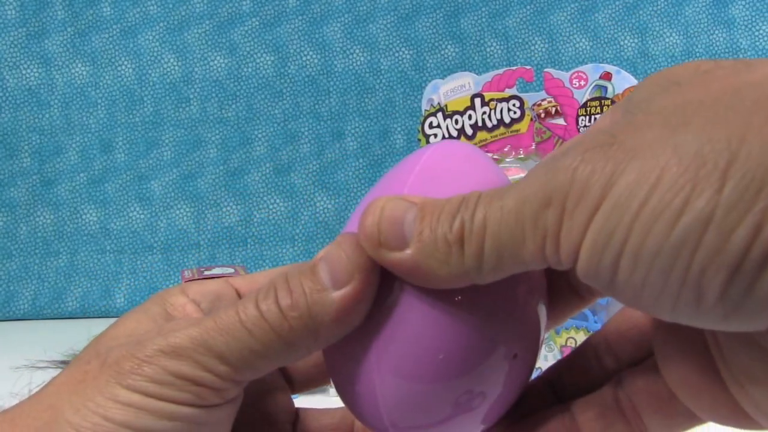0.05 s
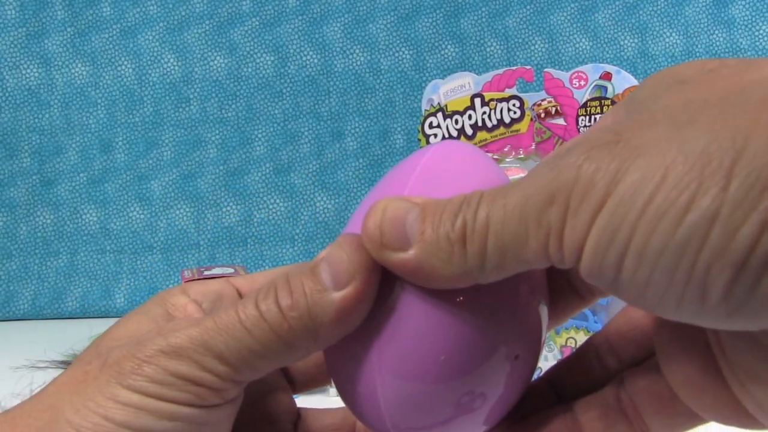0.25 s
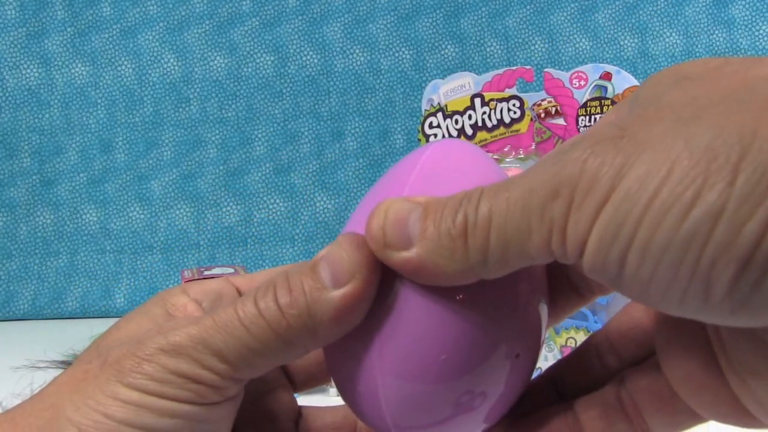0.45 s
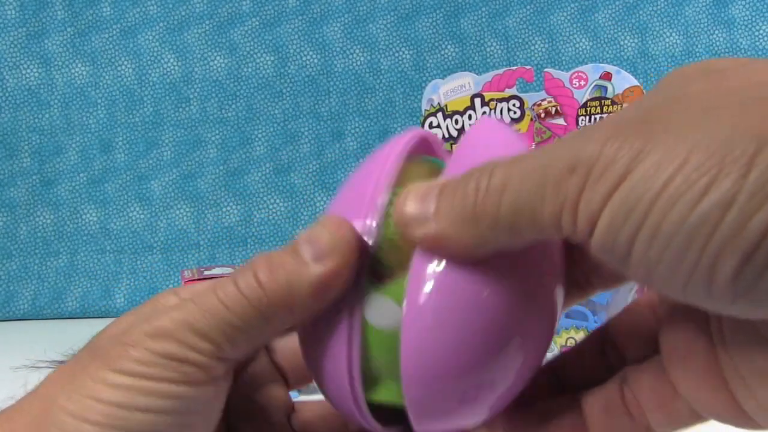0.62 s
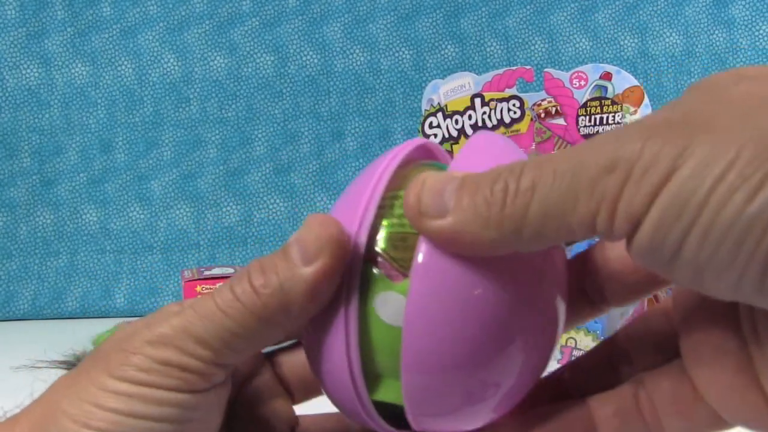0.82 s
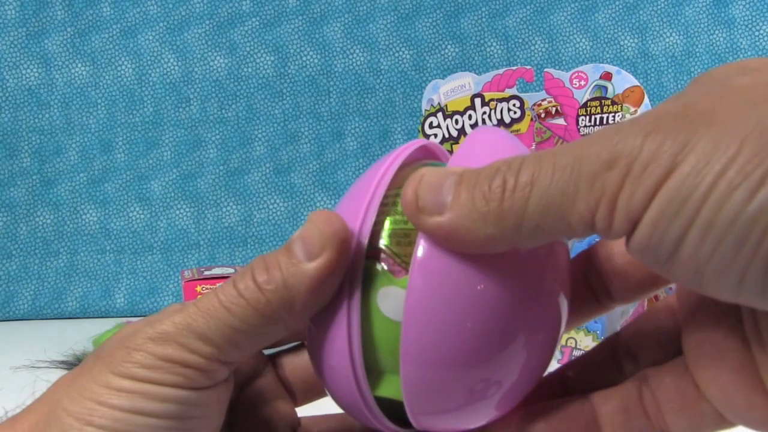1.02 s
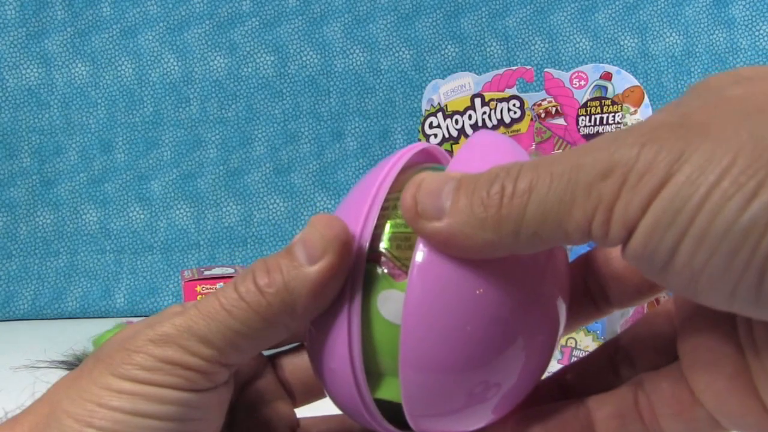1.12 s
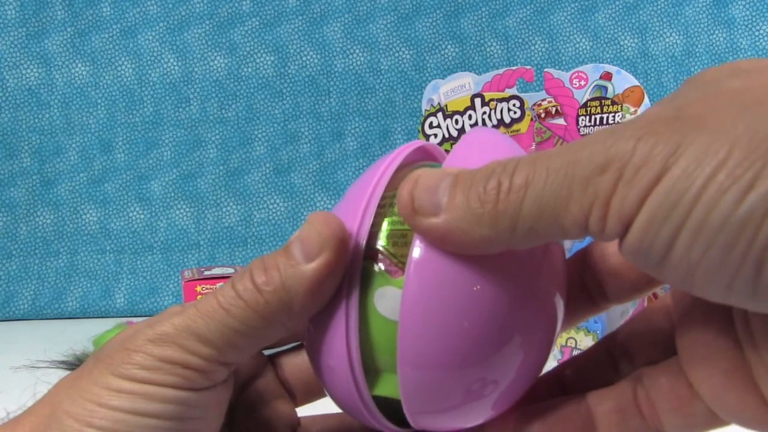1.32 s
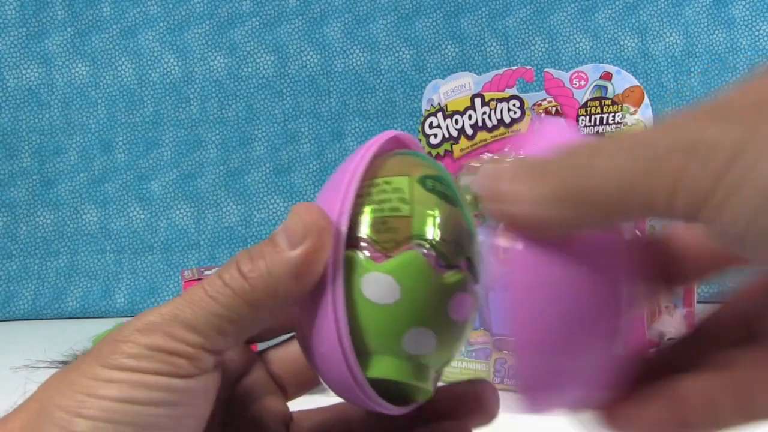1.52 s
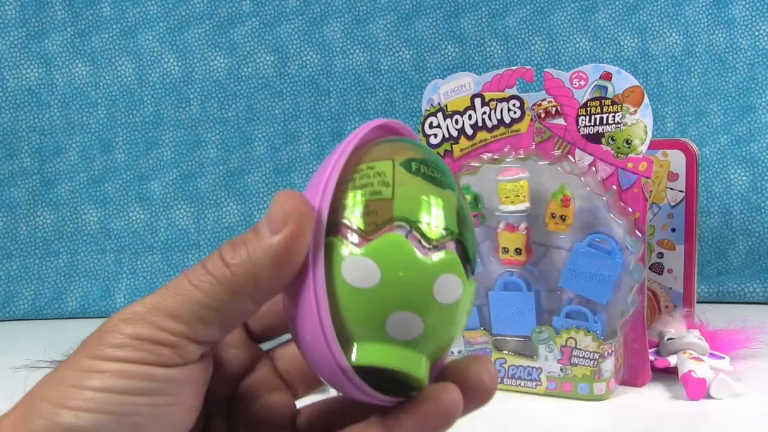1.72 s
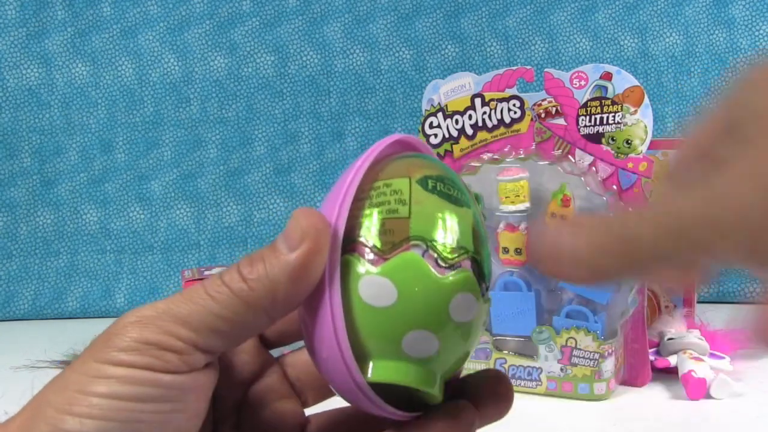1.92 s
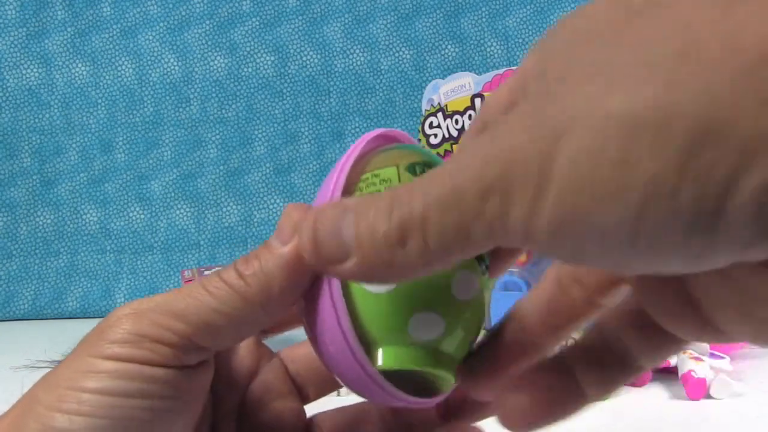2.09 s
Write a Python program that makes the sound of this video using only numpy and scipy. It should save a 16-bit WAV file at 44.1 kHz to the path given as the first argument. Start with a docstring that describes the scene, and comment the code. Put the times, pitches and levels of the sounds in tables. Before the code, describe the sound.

A hollow plastic egg creaks, pops open, and one half clatters onto a table.

```python
"""In a small room, a hollow plastic egg is twisted open close to the microphones.
Its seam creaks by stick-slip friction, the cavity pops as the lip snaps free, and the rims scrape and
click. Fingers rub the shell, foil crinkles, and the foil-wrapped egg inside knocks into one half.
The other half lands on the table and sets it ringing. Each impact excites the resonances of the shell."""
import sys
import numpy as np
from scipy import signal
from scipy.fft import rfft, irfft, next_fast_len
from scipy.io import wavfile
from scipy.ndimage import uniform_filter1d

SR = 44100
rng = np.random.default_rng(int(sys.argv[2]) if len(sys.argv) > 2 else 0)


def dump(signal):
    """Clip the signal to [-1, 1] and save it as 16-bit WAV at the path in sys.argv[1]."""
    limited = np.clip(np.atleast_2d(signal).T, -1, 1)
    pcm = np.round(limited * 32767).astype(np.int16)
    wavfile.write(sys.argv[1], SR, pcm)


N = 94903
SIZE = 4096  # samples in the transform of one impact
POP_S = .668  # the halves part


def amp(db):
    return 10 ** (np.asarray(db) / 20)


def fade(t, t60):
    """Exponential decay: 60 dB in t60 seconds."""
    return np.exp(-np.log(1000) * t / t60)


def along(points, hz):
    """Interpolation of (Hz, value) points on a logarithmic frequency axis."""
    f, v = np.transpose(points)
    return np.interp(np.log(hz + 1), np.log(f + 1), v)


def filtered(x, response):
    """Linear filtering: the spectrum is multiplied by a frequency response."""
    n = x.shape[-1]
    m = next_fast_len(n + 2 * SIZE)
    return irfft(rfft(x, m) * response(np.fft.rfftfreq(m, 1 / SR)), m)[..., :n]


def add(track, s, sound):
    """Superposition: a sound joins the track at s seconds."""
    part = track[max(round(s * SR), 0):][:len(sound)]
    part += sound[:len(part)]


def ringing(modes):
    """Free vibration: each mode is a damped sinusoid."""
    t = np.arange(SR // 2) / SR
    return sum(amp(db) * fade(t, t60) * np.sin(2 * np.pi * hz * t) for hz, db, t60 in modes)


def resonance(rings, hz):
    """Each resonance adds a Lorentzian peak to the power gain."""
    return 1 + sum(amp(db) ** 2 / (1 + (2 * (hz - centre) / width) ** 2) for centre, width, db in rings)


def diffuse(pair):
    """A diffuse field: two independent noises become partly coherent at the two microphones."""
    # Each row: frequency in Hz, left-right coherence.
    coherence = [(100, 0.34), (350, 0.32), (900, 0.29), (2000, 0.45), (5000, 0.46), (12000, 0.92)]
    turn = lambda hz: np.arccos(np.clip(along(coherence, hz), -1, 1)) / 2
    mid, side = filtered(pair, lambda hz: np.array([np.cos(turn(hz)), np.sin(turn(hz))]))
    return np.array([mid + side, mid - side])


def diffuse_noise(colour):
    """Spectrally shaped noise in a diffuse field, at unit RMS."""
    noise = filtered(diffuse(rng.standard_normal((2, N))), lambda hz: amp(along(colour, hz)))
    return noise / np.sqrt(np.mean(noise ** 2) + 1e-20)


def impact(colour, rings, db, tilt_db, scatter_db, scatter_t60):
    """A shell's impulse response: a resonant click, smeared by dispersion and scattering."""
    scatter_hz, dispersion_s, dispersion_hz = 2130, 0.000716, 6980
    hz, t = np.fft.rfftfreq(SIZE, 1 / SR), np.arange(SIZE) / SR
    scatter = rng.standard_normal(SIZE) * fade(t, scatter_t60)
    # Shorter waves scatter round the shell.
    paths = 1 + amp(scatter_db) * hz / (hz + scatter_hz) * rfft(scatter / np.linalg.norm(scatter))
    path_power = uniform_filter1d(np.abs(paths) ** 2, size=25)
    gain = amp(along(colour, hz) + tilt_db * np.log2(np.maximum(hz, colour[2][0])))
    gain *= np.sqrt(resonance(rings, hz) / path_power)
    delay = dispersion_s / (1 + hz / dispersion_hz)  # low bending waves arrive last
    cepstrum = 2 * irfft(np.log(gain))[:SIZE // 2]  # one-sided, so the click is causal
    click = np.exp(rfft(cepstrum, SIZE) - 2j * np.pi * np.cumsum(delay) * hz[1])
    sound = irfft(click * paths)[:SIZE // 2]
    return amp(db) * np.sqrt(.005 * SR) * sound / np.linalg.norm(sound)  # level: energy over 5 ms


def grains(strokes, per_s, colour, spread_db):
    """Friction as a pulse train: each stroke is a run of tiny slips of irregular time and size."""
    out = np.zeros(N)
    for s, length, db in strokes:
        n, count = int(length * SR), max(int(length * per_s), 2)
        jitter, size = rng.random((256, 2))[:count].T
        places = ((np.arange(len(jitter)) + jitter) / len(jitter) * n).astype(int)
        pulses = np.bincount(places, amp(spread_db * size) * (-1) ** places, SIZE)
        stroke = filtered(np.pad(pulses, (SIZE, 0)), lambda hz: amp(along(colour, hz)))
        add(out, s - SIZE / SR, amp(db) * np.sqrt(n) * stroke / np.linalg.norm(stroke))
    return out


def in_room(x, wet_db, pan_db=0, left_lag_s=0, beamed=()):
    """Direct sound, a near wall's reflection and reverberation, which beamed resonances bypass."""
    # The reverberant spectrum. Each row: frequency in Hz, level in dB.
    colour = [(140, 2), (450, 1), (1000, -1.5), (1750, 0.5), (2600, -0.5), (14000, -1.5)]
    # Each row: frequency in Hz, reverberation time in seconds.
    decay = [(100, 0.47), (300, 0.43), (1000, 0.52), (6000, 0.36), (14000, 0.27)]
    # Standing waves. Each row: frequency in Hz, level in dB, T60 in seconds.
    modes = [(124.7, -59, 0.65), (213.5, -50.5, 0.3), (295, -49, 0.4)]
    echo_s, echo_db = .0091, -15.5
    hz, t, noise = signal.stft(rng.standard_normal((2, SR // 2)), SR, nperseg=256)
    envelope = fade(t, along(decay, hz)[:, None]) * (1 - fade(t, 0.017))
    spectra = noise * amp(along(colour, hz))[:, None] * envelope
    tail = diffuse(signal.istft(spectra, SR, nperseg=256)[1])
    tail = tail[:, :SR // 2] / np.linalg.norm(tail[0]) + ringing(modes)
    sides = np.array([[.5], [-.5]])  # left, right
    direct = lambda f: amp(sides * pan_db) * np.exp(-2j * np.pi * f * sides * left_lag_s)
    echo = lambda f: amp(echo_db) * np.exp(-2j * np.pi * f * echo_s)
    off_axis = filtered(x, lambda f: 1 / np.sqrt(resonance(beamed, f)))
    reverb = signal.fftconvolve(off_axis[None], tail, axes=1)[:, :N]
    return filtered(x, lambda f: direct(f) + echo(f)) + amp(wet_db) * reverb


def room_tone():
    """Ambient noise forms a steady diffuse field."""
    # Each row: frequency in Hz, level in dB.
    colour = [(25, -38), (82, -5), (204, -1.5), (389, -6), (648, -6.5), (1170, -11.5), (2850, -15.5),
              (15500, -27)]
    return amp(-56) * diffuse_noise(colour)


def twist_hiss():
    """Sliding friction of skin and strained plastic hisses faintly until the egg opens."""
    # Each row: frequency in Hz, level in dB.
    colour = [(200, -7), (1000, -4.5), (6000, 3), (15000, -12)]
    twisting = np.interp(np.arange(N) / SR, [0, .4, POP_S], [1, .7, 0])
    return amp(-61) * twisting * diffuse_noise(colour)


def seam_creak():
    """Stick-slip friction: each slip of the seam ticks the shell, brighter as the seam tightens."""
    # Single slips. Each row: start in seconds, level in dB.
    slips = [(0.0108, -41), (0.0303, -42.5), (0.0636, -47), (0.153, -41.5), (0.2185, -41), (0.2573, -43),
             (0.2913, -43.5), (0.3353, -44), (0.3827, -38.5), (.400, -44), (.449, -45), (0.4633, -43),
             (0.4777, -41), (0.488, -42.5), (0.623, -46), (0.6366, -47.5)]
    # A quick run of slips. Each row: time in seconds, slips per second, level in dB.
    run = [(.499, 120, -45), (0.523, 160, -49), (0.589, 120, -51.5)]
    # The closed shell's spectrum. Each row: frequency in Hz, level in dB.
    colour = [(80, -18), (220, -3.5), (600, -3), (950, -8), (1900, -11.5), (2800, -14), (5000, -23),
              (14000, -41)]
    # Its resonances. Each row: centre in Hz, width in Hz, gain in dB.
    rings = [(488, 78, 10), (740, 140, 14), (1162, 55, 16.5), (1766, 170, 13.5)]
    brightening = 4.16  # dB per octave per second
    s, rate, level = np.transpose(run)
    t = np.arange(s[0], s[-1], 1 / SR)
    slip_count = np.floor(np.cumsum(np.interp(t, s, rate)) / SR)
    times = t[np.diff(slip_count, prepend=-1) > 0]
    quick = [(at + rng.normal(0, 0.00081), np.interp(at, s, level) + rng.normal(0, 1.48))
             for at in times]
    out = np.zeros(N)
    for at, db in slips + quick:
        tilt_db = brightening * (at - POP_S / 2)
        add(out, at, impact(colour, rings, db, tilt_db, scatter_db=8.5, scatter_t60=0.011))
    return in_room(out, wet_db=-10)


def opening():
    """Cavity resonance: the lip snaps over its groove, and a pop climbs in pitch as the gap widens."""
    # Each row: start in seconds, level in dB, tilt in dB per octave, ping gain in dB.
    snaps = [(0.6626, -28, 0.5, -1), (0.6664, -20.5, 1.5, 8.5), (0.6692, -16.5, 1.5, 16.5),
             (0.6708, -14.5, 1, 3), (0.6738, -14.5, 0.5, -11)]
    # The lip's spectrum. Each row: frequency in Hz, level in dB.
    colour = [(60, -18.5), (130, 0), (230, 3), (550, -1), (850, 7), (1150, -4), (1750, -3.5), (2400, -12),
              (4400, -9.5), (6000, -15), (10000, -17), (11000, -25.5), (15500, -31.5)]
    pop_hz, glide_hz_per_s, rise_s, fall_s = 465, 69000, .0019, .0014
    ping_hz, width_hz, beam_db = 2970, 200, 11
    t = np.arange(N) / SR - POP_S
    swell = np.exp(-(t / np.where(t < 0, rise_s, fall_s)) ** 2)
    pop = -amp(-1.5) * swell * np.cos(2 * np.pi * (pop_hz + glide_hz_per_s * t / 2) * t)
    lip = np.zeros(N)
    for s, db, tilt_db, ping_db in snaps:
        ping = [(ping_hz, width_hz, ping_db)]
        add(lip, s, impact(colour, ping, db, tilt_db, scatter_db=7, scatter_t60=0.013))
    beam = [(ping_hz, width_hz, beam_db)]
    return in_room(pop, wet_db=-14.5) + in_room(lip, wet_db=-10.5, pan_db=3, beamed=beam)


def rims():
    """Friction and impact: the freed rims scrape, and their clicks excite a hoop resonance."""
    # Each row: start in seconds, length in seconds, level in dB.
    scrapes = [(.679, 0.03, -41.5), (.717, .02, -34), (.737, .04, -38), (.789, .05, -41), (.852, .024, -44)]
    # Each row: start in seconds, level in dB, tilt in dB per octave, hoop gain in dB.
    clicks = [(0.7113, -26, -3, 18), (0.7162, -44, 8, 26), (0.721, -23, 0, 5), (0.724, -25, 1, -12),
              (0.7795, -15, 2.44, 14.5), (0.7882, -29, 5.5, -10), (0.8162, -25.5, 1, 14.5),
              (.8255, -43, 2, 16), (0.85, -45, -3.5, 0), (0.8568, -34, 1.5, -13), (0.9104, -54, -1, 0)]
    # The rims' spectrum. Each row: frequency in Hz, level in dB.
    colour = [(60, -34.5), (200, -9), (450, 3.5), (900, 2.5), (1300, -3), (2200, -5.5), (2750, -12),
              (3900, -3), (6200, -8.5), (7200, -12.5), (10200, -14), (15500, -27)]
    hoop_hz, width_hz, beam_db = 1800, 230, 8
    out = grains(scrapes, per_s=1100, colour=colour, spread_db=26)
    for s, db, tilt_db, hoop_db in clicks:
        hoop = [(hoop_hz, width_hz, hoop_db)]
        add(out, s, impact(colour, hoop, db, tilt_db, scatter_db=11, scatter_t60=0.013))
    return in_room(out, wet_db=-12, pan_db=-3, beamed=[(hoop_hz, width_hz, beam_db)])


def finger_rubs():
    """Friction of fingers on the shell gives dull slips of nearly equal size."""
    # Each row: start in seconds, length in seconds, level in dB.
    rubs = [(.998, 0.0045, -47), (1.014, 0.011, -42), (1.033, 0.02, -53), (1.203, 0.009, -48.5),
            (1.22, 0.031, -49.5)]
    # Each row: frequency in Hz, level in dB.
    colour = [(100, -25), (320, 0.5), (480, 4), (620, 7), (830, 7.5), (1050, -25), (3000, -23.5),
              (12000, -32)]
    return in_room(grains(rubs, per_s=380, colour=colour, spread_db=-2), wet_db=-10.5)


def foil_crinkles():
    """Crinkling foil radiates dense, bright impulses of widely varying size."""
    # Each row: start in seconds, length in seconds, level in dB.
    crinkles = [(1.457, 0.0045, -58), (1.663, .008, -57), (2.034, 0.0094, -46.5), (2.1108, 0.0043, -36.5),
                (2.115, 0.0089, -46.5), (2.1255, .017, -37.5), (2.146, 0.015, -62)]
    # Each row: frequency in Hz, level in dB.
    colour = [(120, -55), (200, -17.5), (1200, -9), (1570, -12.5), (2250, -6.5), (3800, -4.5),
              (4200, -10.5), (7420, -15.5), (15000, -32)]
    return in_room(grains(crinkles, per_s=4000, colour=colour, spread_db=23), wet_db=-3.5)


def inner_egg():
    """Impact excitation: the wrapped egg tips into the held half, which resonates."""
    # Each row: start in seconds, level in dB, tilt in dB per octave.
    knocks = [(1.7768, -10, 1), (1.7828, -21.5, 3), (1.7883, -20, -0.5)]
    # The held half's spectrum. Each row: frequency in Hz, level in dB.
    colour = [(60, -29), (130, -18), (280, -7), (550, -3.5), (1000, -5), (1600, -4.5), (2100, -12.5),
              (2900, -21), (4500, -21.5), (6000, -27), (9000, -32), (15000, -48.5)]
    # Its resonances. Each row: centre in Hz, width in Hz, gain in dB.
    rings = [(355, 90, 14), (720, 60, 11), (1300, 260, 7)]
    out = np.zeros(N)
    for s, db, tilt_db in knocks:
        add(out, s, impact(colour, rings, db, tilt_db, scatter_db=13, scatter_t60=0.017))
    return in_room(out, wet_db=-5.5, pan_db=-5)


def empty_half():
    """The empty half clatters down on the right; its hardest blow sets the table in free vibration."""
    # Each row: start in seconds, level in dB, tilt in dB per octave.
    landings = [(1.862, -14.5, 4), (1.865, -6.5, 3), (1.867, -16, 5.5), (1.8704, -22.5, 4),
                (1.8766, -23.5, 3), (1.8936, -20.5, -1)]
    # The empty half's spectrum. Each row: frequency in Hz, level in dB.
    colour = [(60, -41), (160, -7), (320, -4.5), (480, -2), (620, -1.5), (1150, 0.5), (1800, -9.5),
              (2500, -13.5), (3600, -18.5), (5300, -25.5), (8500, -33.5), (15000, -53.5)]
    # Its resonances. Each row: centre in Hz, width in Hz, gain in dB.
    rings = [(650, 70, 7), (860, 130, 11), (2270, 200, 4), (2750, 360, 8)]
    # The table and what stands on it. Each row: frequency in Hz, level in dB, T60 in seconds.
    table_modes = [(140.5, -26.5, .04), (443.2, -29, 0.25), (710, -47, 0.23), (831, -34.5, 0.42),
                   (905, -49, 0.33), (1010, -33.5, 0.55), (1200, -42, 0.3), (2200, -50, .28)]
    out = np.zeros(N)
    for s, db, tilt_db in landings:
        add(out, s, impact(colour, rings, db, tilt_db, scatter_db=6.5, scatter_t60=0.023))
    add(out, landings[1][0], ringing(table_modes))
    return in_room(out, wet_db=-7, pan_db=-4, left_lag_s=0.00015)


def scene():
    """The sources add by superposition."""
    impacts = opening() + rims() + inner_egg() + empty_half()
    return impacts + room_tone() + twist_hiss() + finger_rubs() + foil_crinkles() + seam_creak()


def record(dry):
    """Soft saturation rounds the loudest peaks, and a steep low-pass limits the band."""
    top_hz = 15700
    rounded = dry / (1 + np.abs(dry) ** 6) ** (1 / 6)
    return filtered(rounded, lambda hz: 1 / np.sqrt(1 + (hz / top_hz) ** 160))


dry = scene()
out = record(dry)
dump(out)
```